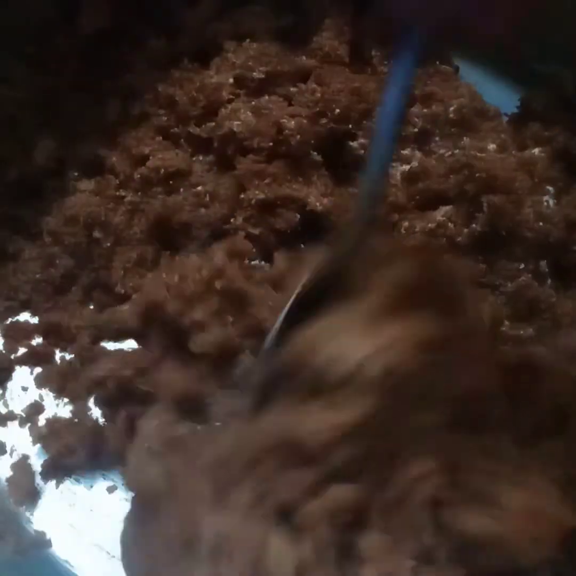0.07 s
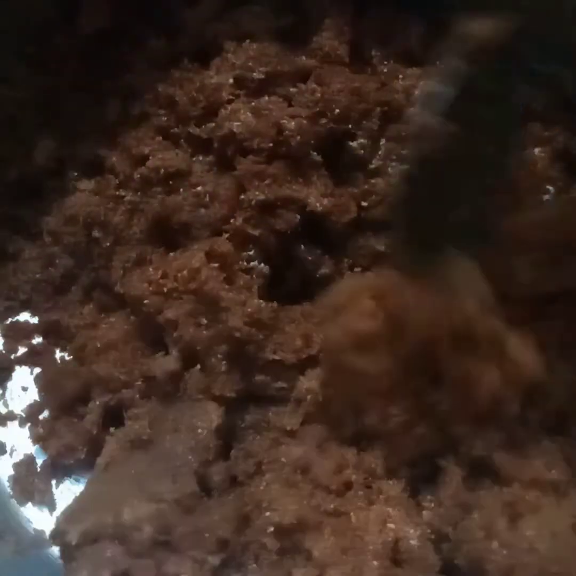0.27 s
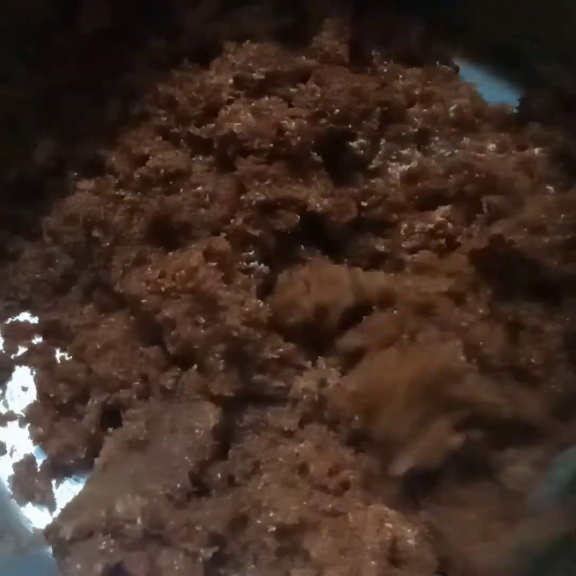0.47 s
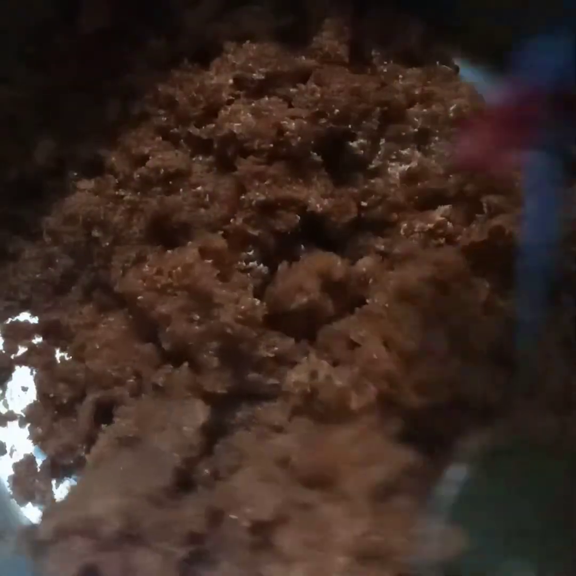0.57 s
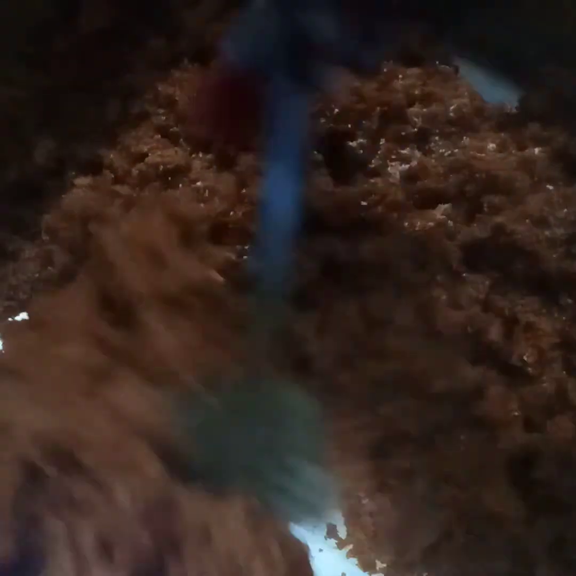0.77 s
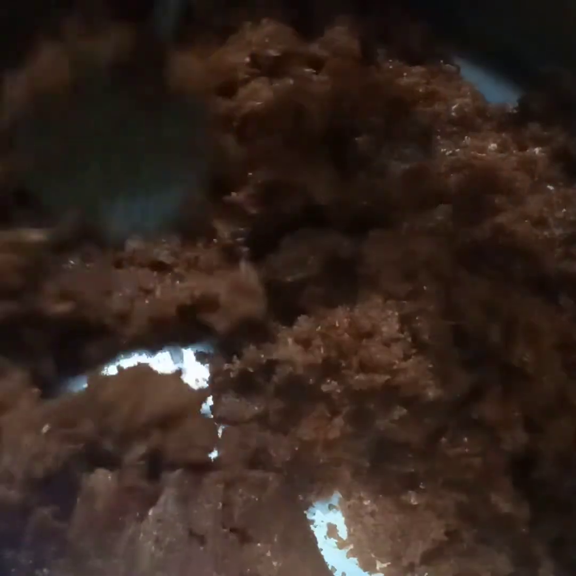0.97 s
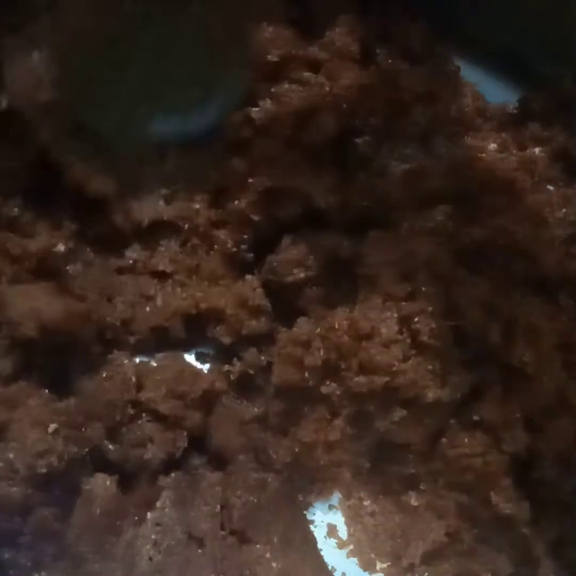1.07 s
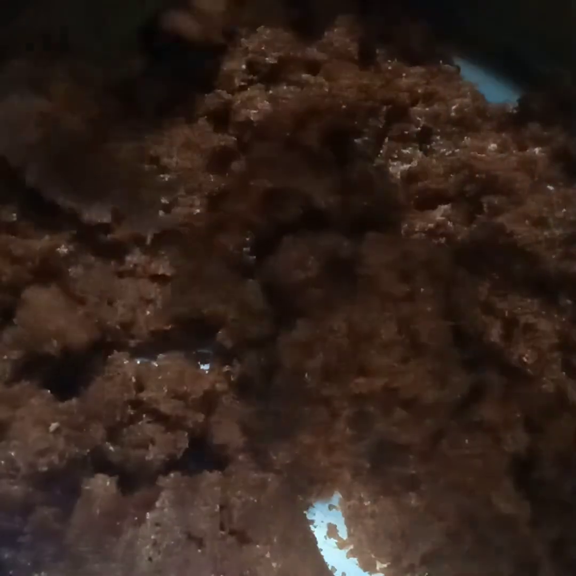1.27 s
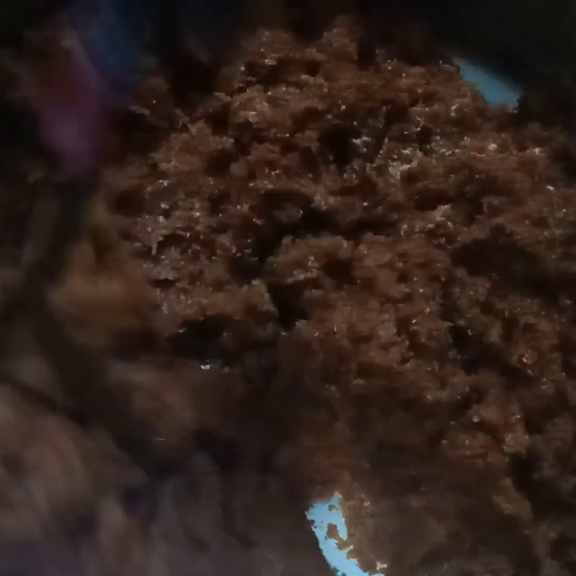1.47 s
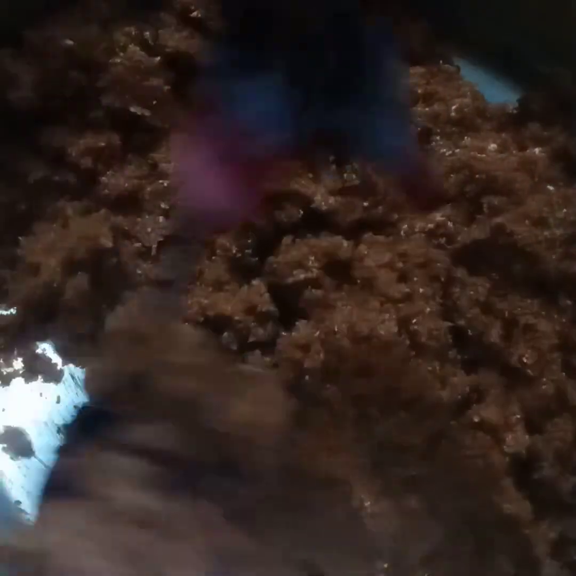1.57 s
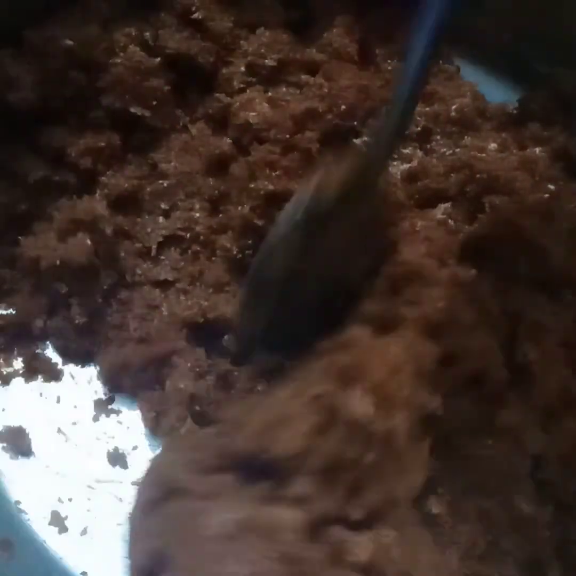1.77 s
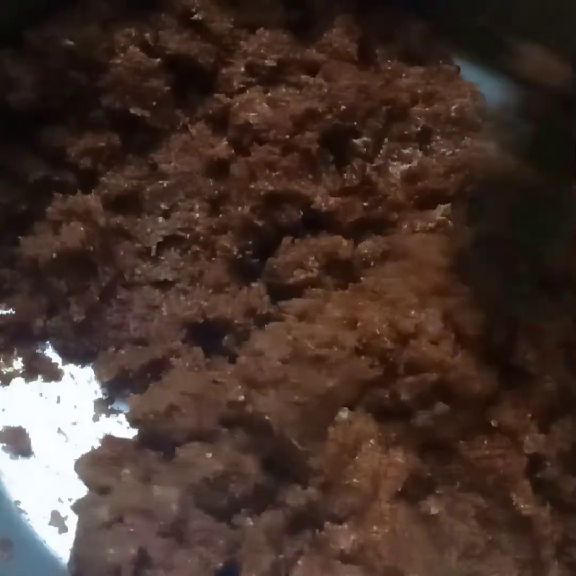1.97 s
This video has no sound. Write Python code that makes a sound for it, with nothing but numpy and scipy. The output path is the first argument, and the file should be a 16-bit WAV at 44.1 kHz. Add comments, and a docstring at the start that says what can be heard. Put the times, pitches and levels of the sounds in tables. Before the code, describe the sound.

A metal spatula turns thick pudding in a large metal pot, heard close. A soft sticky hiss fades by 0.4 s; a bright ringing clank hits at 0.52, then muffled strokes run from 0.6 to 1.1. Another clank comes at 1.3 with a short squeaky scrape, then the loudest, lower knock at 1.52 and rough scraping until 1.7, fading away. Faint sizzle and tiny crackles continue.

```python
"""A metal spatula turns thick pudding in a large metal pot, close to a small microphone.
Its knocks ring the pot: decaying sine modes plus a clatter of crowded overtones.
Its strokes hiss, rub and rumble: shaped grains and noise, which also keep the pot ringing.
Puffs, ticks and squeaks are resonant noise; fat sizzles (grains) and crackles (few-cycle bursts) faintly."""
import sys
import numpy as np
from scipy import signal
from scipy.fft import rfft, irfft
from scipy.io import wavfile
from scipy.ndimage import uniform_filter1d

SR = 44100
rng = np.random.default_rng(int(sys.argv[2]) if len(sys.argv) > 2 else 0)


def bounce(signal):
    """Save signal as a 16-bit WAV file at the path given by the first command-line argument."""
    frames = np.transpose(np.atleast_2d(signal))
    limited = np.clip(frames, -1, 1)
    pcm = np.round(limited * 32767).astype(np.int16)
    wavfile.write(sys.argv[1], SR, pcm)


def boost(x):
    """Linear amplitude factor 10**(x/20) for a level x in decibels (scalar or array-like)."""
    u = np.asarray(x, float) / 20
    return 10 ** u


N = 88817


def evened(x):
    """Scales to an rms of one."""
    return x / np.sqrt(np.mean(x ** 2) + 1e-20)


def read(points, hz):
    """Interpolates a table on a log-frequency axis."""
    f, value = np.transpose(points)
    return np.interp(np.log(hz + 1), np.log(f + 1), value)


def add(mix, start_s, sound):
    """Lays a sound into the mix, cut at its end."""
    part = mix[round(start_s * SR):][:len(sound)]
    part += sound[:len(part)]


def coloured(x, points):
    """Weights the spectrum by a table; rms of one."""
    hz = np.fft.rfftfreq(len(x), 1 / SR)
    spectrum = rfft(x) * boost(read(points, hz))
    return evened(irfft(spectrum, len(x)))


def patchy(x):
    """Level wanders in small patches of time and frequency; rms of one."""
    spread_db = 1.6
    z = signal.stft(x, nperseg=256)[2]
    field = uniform_filter1d(rng.standard_normal(z.shape), size=4, axis=0)  # over frequency
    field = uniform_filter1d(field, size=9, axis=1)  # over time
    varied = signal.istft(z * boost(spread_db * evened(field)), nperseg=256)[1]
    return evened(varied[:len(x)])


def resonate(x, hz, width_hz):
    """One-pole resonance of gain one: shifted to 0 Hz, smoothed, shifted back."""
    turn = np.exp(2j * np.pi * hz * np.arange(len(x)) / SR)
    r = np.exp(-np.pi * width_hz / SR)
    return 2 * (turn * signal.lfilter([1 - r], [1, -r], x / turn)).real


def grains(spread_db):
    """Dense tiny slips as random signed impulses; size varies by spread_db and in clumps."""
    grains_per_s, clump_db = 5000, 0.86
    clumps = evened(uniform_filter1d(rng.standard_normal(N), size=150))
    size = boost(spread_db * np.minimum(rng.exponential(1, N), 5) + clump_db * clumps)
    struck = rng.random(N) < grains_per_s / SR
    return size * struck * rng.choice([-1., 1.], N)


def sizzle():
    """Steady frying under everything: uneven grains through a fixed spectrum."""
    level_db = -50.5
    # frying spectrum: f/Hz, relative level/dB
    frying = [(18, -63), (30, -30), (308, -18), (693, -43), (1370, -24), (2430, -52), (2700, -24),
              (3510, -67), (4220, -6.5), (5060, -41), (5620, -7), (6750, -5), (7700, -2), (9740, -9.5),
              (13000, -8.5), (14400, -1), (15600, -7)]
    return boost(level_db) * patchy(coloured(grains(3.6), frying))


def pops():
    """Bursting bubbles of fat: a few cycles of rising pitch and a reflection from the pot wall."""
    length_cycles, echo_s, echo_db = 3.04, 0.0022, -2.5
    # crackles: t/s, peak level/dB, starting f/Hz
    crackles = [(0.2564, -28, 8300), (0.2737, -27.5, 7250), (0.2962, -27.5, 7400), (0.3523, -18.5, 8540),
                (0.375, -27, 7400), (0.9377, -21, 7550), (1.0556, -21.5, 7500), (1.1101, -23, 6900),
                (1.1353, -26.5, 7250), (1.1494, -38, 6540), (1.1782, -36, 7800), (1.2234, -35, 7300),
                (1.2667, -33, 6940), (1.4908, -24, 7900), (1.7459, -31, 7270), (1.7644, -51, 7230),
                (1.7894, -26.5, 9700), (1.801, -28, 7600)]
    out, t = np.zeros(N), np.arange(400) / SR
    for start_s, db, hz in crackles:
        u = t * hz / length_cycles
        envelope = np.e * 3 * u * np.exp(-3 * u)  # peak 1 at u = 1/3
        pop = boost(db) * envelope * np.sin(2 * np.pi * hz * t * (1 + 0.033 * u))
        add(out, start_s, pop)
        add(out, start_s + echo_s, boost(echo_db) * pop)
    return out


def plops():
    """Puffs, ticks and squeaks of blade and lumps, two thin hisses: noise twice through one resonance."""
    attack_s = 0.00098
    # narrow-band bursts: t/s, level/dB, f/Hz, width of each resonance/Hz, length/s
    bursts = [(.001, -47.5, 417, 395, .07), (.215, -49.5, 445, 277.8, .05), (.22, -50, 182, 123, 0.053),
              (.222, -52.5, 2100, 303, 0.049), (.226, -53, 1130, 150, .08), (.239, -44, 13500, 4000, .006),
              (.315, -64, 1290, 120, .09), (0.333, -39, 13900, 3000, 0.012), (.345, -59.5, 4290, 288, 0.18),
              (.409, -54, 1290, 130, .04), (0.529, -65, 91, 80, 0.18), (.93, -78, 560, 148, 0.02),
              (1.04, -66.5, 106, 46.3, 0.24), (1.05, -58, 397, 170, 0.057), (1.16, -63, 4320, 345, 0.43),
              (1.32, -51, 135, 60, 0.19), (1.352, -33, 3435, 199, 0.043), (1.375, -32, 5570, 200, .02),
              (1.405, -36.5, 2477, 118, 0.052), (1.735, -34.5, 13500, 4000, 0.0068),
              (1.815, -51.5, 1634, 140, .12)]
    out, t = np.zeros(N), np.arange(16000) / SR
    for start_s, db, hz, width_hz, length_s in bursts:
        noise = rng.standard_normal(len(t))
        puff = evened(resonate(resonate(noise, hz, width_hz), hz, width_hz))
        envelope = np.minimum(t / attack_s, 1) * np.exp(-2.5 * (t / length_s) ** 2)
        add(out, start_s, boost(db) * envelope * puff)
    return out


def ring(place):
    """Clear pot modes after one blow: decaying sines; the higher ones start in either direction."""
    swing_up_cycles, sign_above_hz = 1, 1300
    # mode frequencies: f/Hz
    hz = np.array([237, 262, 354, 452, 552, 576, 798, 823, 899, 974, 1050, 1114, 1220, 1410, 1597, 1675,
                   1745, 1782, 1874, 2079, 2331, 2522, 3435, 3611, 3741, 3920, 4134, 4511, 4953, 5410, 5590,
                   6062, 6245, 6713, 6907, 7349, 7500, 8990, 9925])
    # same modes: t60/s, then level/dB when struck at place 0, 1, 2
    modes = np.array([(0.81, -49, -34.5, -23), (0.32, -65, -37.5, -30), (0.59, -61, -48, -29.5),
                      (0.36, -53, -61, -32), (0.078, -31.5, -44.5, -14), (0.97, -54, -38, -23.5),
                      (2.05, -58.5, -42.5, -28), (0.35, -71, -67, -26), (1.49, -44, -41, -43),
                      (1.1, -50, -44, -41.5), (0.05, -37, -47, -12), (0.2, -76, -43, -25.5),
                      (0.23, -67, -42.5, -27), (0.98, -62, -42.5, -44.5), (0.56, -83, -88, -33.5),
                      (0.55, -60, -30.5, -60), (0.39, -40, -34, -47), (0.44, -34, -34.5, -66),
                      (0.6, -51, -64.5, -65), (0.9, -47, -48, -66), (0.41, -40.5, -73, -46),
                      (0.084, -28, -27.5, -27.5), (0.38, -36.5, -32, -56), (0.1, -27, -20, -55),
                      (0.086, -29, -28, -58), (0.19, -30.5, -26.5, -62), (0.48, -41, -48, -53),
                      (0.61, -43, -40, -40), (0.087, -29.5, -31, -32), (0.17, -64, -39, -47),
                      (0.12, -55, -29, -50), (0.22, -54, -81, -29.5), (0.34, -58, -39, -53),
                      (0.077, -27, -25.5, -25), (0.31, -43, -37, -30), (0.24, -28, -50, -45),
                      (0.082, -23, -30, -24), (0.093, -26.5, -60, -53), (0.12, -28, -36, -42)])
    t = np.arange(SR * 3 // 2)[:, None] / SR
    sign = np.where(hz > sign_above_hz, rng.choice([-1., 1.], len(hz)), 1)
    swing = (1 - np.exp(-t * hz / swing_up_cycles)) * sign
    decay = boost(modes[:, 1 + place] - 60 * t / modes[:, 0])
    return (decay * swing * np.sin(2 * np.pi * hz * t)).sum(1)


def stroke():
    """Sticky hiss of the pudding, rub and rumble of the blade; rub and rumble keep the pot ringing."""
    rub_ring_db, rumble_ring_db = -13.5, -5
    smother_t60_s = 0.35  # the pudding under the blade shortens the ring
    # stroke levels: t/s, hiss level/dB, level of the rub carried by the pot/dB, low rumble level/dB
    course = [(0, -33, -72, -58.5), (.07, -28.5, -58, -58.5), (0.122, -33, -43, -55.5),
              (.19, -35, -62, -71), (.22, -41.5, -65, -68), (.3, -46, -102, -85), (0.391, -51, -89, -80),
              (.51, -67, -69, -69), (0.618, -40, -42, -43.5), (.69, -42.5, -52, -68.5),
              (0.778, -38, -56.5, -62), (.86, -37, -52.5, -75), (0.949, -34.5, -48, -63),
              (.99, -37, -53.5, -74), (1.07, -34.5, -48.5, -66), (1.12, -45.5, -57, -71),
              (1.16, -68, -74.5, -82), (1.3, -63.5, -71, -75.5), (1.335, -48, -50, -38),
              (1.372, -26.5, -32.5, -70), (1.4, -45, -33.5, -54), (1.44, -40.5, -45, -50.5),
              (1.48, -37.5, -40.5, -65), (1.501, -41, -47, -61), (1.503, -17, -47, -57),
              (1.511, -20, -44, -58), (1.53, -27, -33, -32), (1.57, -33, -30, -32.5),
              (1.62, -24.5, -31, -38.5), (1.64, -32.5, -34, -34), (1.7, -45.5, -43.5, -40),
              (1.78, -39.5, -52, -49.5), (1.83, -46.5, -56, -49), (1.87, -54, -71, -61.5),
              (2.01, -53, -66, -69)]
    # spectra of hiss, rub and rumble, each: f/Hz, relative level/dB
    hiss_shape = [(200, -70), (880, -30), (1500, -15.5), (2050, -17), (2470, -14), (4080, -6),
                  (5160, -12.5), (6400, -3), (7480, 2), (8410, -4.5), (10200, -7), (11700, -8),
                  (14300, 0.5), (15600, -5)]
    rub_shape = [(350, -59), (700, -21), (900, -4.5), (1260, 0), (1650, -2), (2940, -6.5), (3600, -3),
                 (5000, -8), (7500, -1), (9500, -13.5), (13000, -27)]
    rumble_shape = [(20, -70), (60, -35), (150, -16), (240, 3.5), (350, -9.5), (560, -6.5), (800, -6),
                    (1200, -12), (1700, -27), (2600, -80)]
    s, *dbs = np.transpose(course)
    levels = [boost(np.interp(np.arange(N) / SR, s, db)) for db in dbs]
    drives = grains(0), evened(grains(0)), rng.standard_normal(N)
    out = np.zeros(N)
    for level, drive, shape in zip(levels, drives, (hiss_shape, rub_shape, rumble_shape)):
        out += level * patchy(coloured(drive, shape))
    smother = boost(-60 * np.arange(SR // 2) / SR / smother_t60_s)
    # layer 1 (rub) rings the pot at place 1, layer 2 (rumble) at place 2
    for place, db in ((1, rub_ring_db), (2, rumble_ring_db)):
        body = ring(place)[:SR // 2] * smother
        body = body / np.linalg.norm(body)
        out += boost(db) * signal.fftconvolve(levels[place] * drives[place], body)[:N]
    return out


def thud():
    """Push of the flat blade as it lands: one and a half cycles under a sin-squared window."""
    start_s, level_db, hz, cycles = 1.5181, -12, 760, 1.5
    out, u = np.zeros(N), np.arange(0, cycles, hz / SR)
    add(out, start_s, boost(level_db) * np.sin(np.pi * u / cycles) ** 2 * np.sin(2 * np.pi * u))
    return out


def clatter(hz, t60_s, tilt_db):
    """Crowded decaying overtones of chance strength and phase; tilt_db per octave about 3 kHz."""
    rise_s = 0.0004
    # strength of the dense overtones: f/Hz, relative level/dB
    strength = [(88, -46), (150, -8.5), (437, -19), (585, -0.5), (738, -19), (1570, -4), (1770, 0),
                (2070, -7), (2420, -5), (3490, 7), (4860, 3.5), (7450, 9), (15600, -4.5)]
    t = np.arange(SR // 4, dtype=np.float32)[:, None] / SR
    size = rng.standard_normal(len(hz)) * boost(read(strength, hz) + tilt_db * np.log2(hz / 3000))
    phase = (2 * np.pi * (hz * t + rng.random(len(hz)))).astype(np.float32)
    decay = np.exp((-np.log(1000) * t / t60_s).astype(np.float32))
    tail = (decay * np.sin(phase)) @ (size / np.linalg.norm(size))
    fade = np.cos(2 * np.pi * t[:, 0])  # reaches zero at 0.25 s
    return np.sqrt(2) * tail * np.minimum(t[:, 0] / rise_s, 1) * fade


def knocks():
    """Spatula against pot: each blow starts the clear modes and the dense clatter."""
    overtones, t60_spread_db = 1100, 1.5
    # blows: t/s, gain of clear modes/dB, clatter level/dB, clatter tilt/(dB/octave),
    # clatter t60 as share of the free t60 [1], place struck [0-2]
    blows = [(.5175, 2.35, -20, 0.5, 1.88, 0), (1.3043, 1.2, -22, -4.5, 0.53, 1),
             (1.347, -9.5, -30, -4.5, 1.3, 1), (1.5180, 0.46, -24, -8.5, 0.95, 2),
             (1.5355, -18.5, -13.5, 1, 0.079, 2), (1.816, -33, -53, -1, 0.17, 1)]
    # free decay of the clatter: f/Hz, t60/s
    free_decay = [(200, 0.67), (1000, 0.25), (3000, 0.22), (7000, 0.17), (15000, 0.11)]
    out = np.zeros(N)
    hz = 200 + 15500 * (np.arange(overtones) + rng.random(overtones)) / overtones
    t60_s = read(free_decay, hz) * boost(t60_spread_db * rng.standard_normal(overtones))
    for start_s, ring_db, clatter_db, tilt_db, free_share, place in blows:
        add(out, start_s, boost(ring_db) * ring(place))
        add(out, start_s, boost(clatter_db) * clatter(hz, free_share * t60_s, tilt_db))
    return out


def scene():
    """All sources, one microphone."""
    return (knocks() + thud() + stroke() + sizzle() + pops() + plops())[None]


def band_limit(x):
    """A steep low-pass at the top of the band."""
    return signal.sosfilt(signal.butter(12, 16800, fs=SR, output="sos"), x)


def record(dry):
    """Small microphone without deep bass, then a band limit."""
    bass_cut_hz, edge_hz = 76, 15520
    high_pass = signal.butter(2, bass_cut_hz, "high", fs=SR, output="sos")
    thin = signal.sosfilt(high_pass, dry)
    low_pass = signal.firwin(601, edge_hz, window=("kaiser", 7), fs=SR)
    mix = signal.oaconvolve(thin, low_pass[None], "same")
    return band_limit(mix)


dry = scene()
out = record(dry)
bounce(out)
```